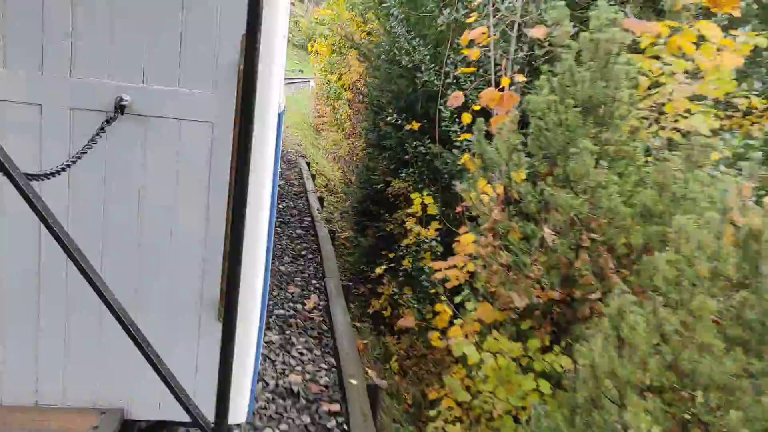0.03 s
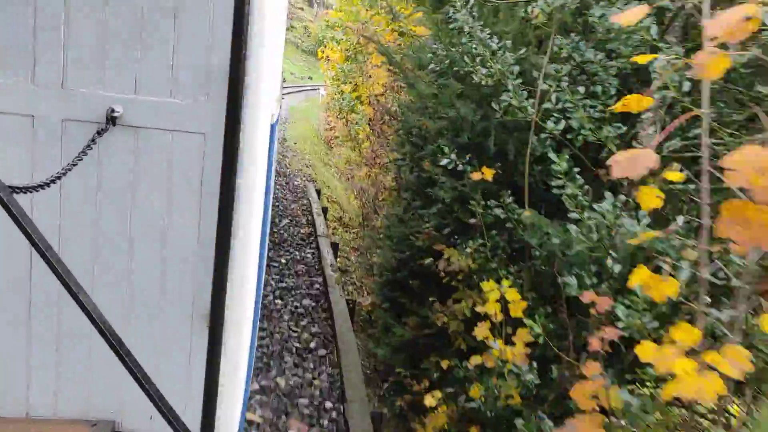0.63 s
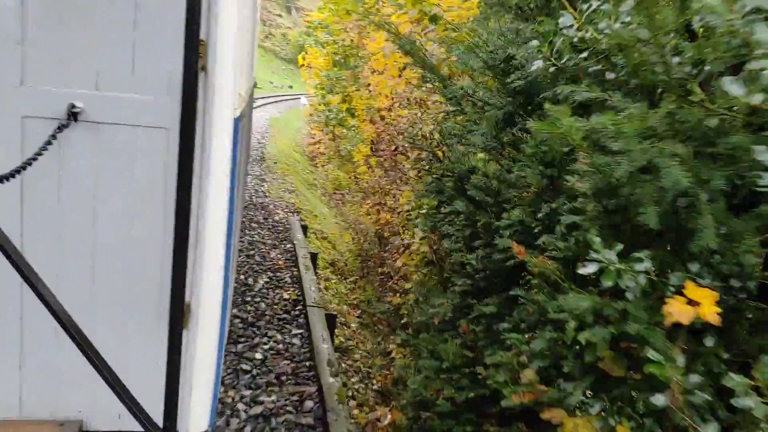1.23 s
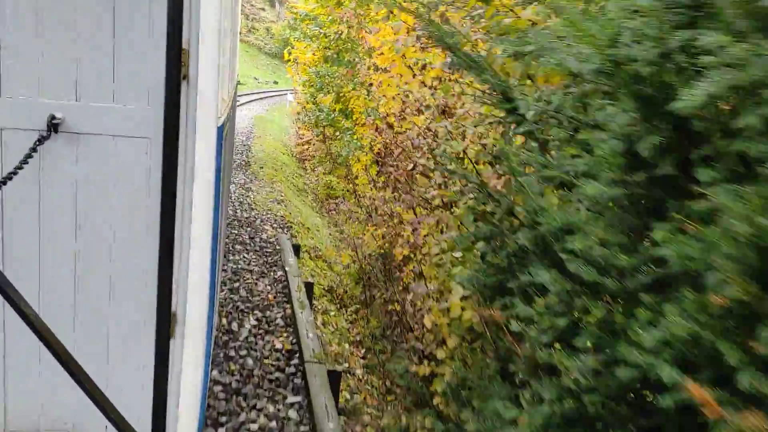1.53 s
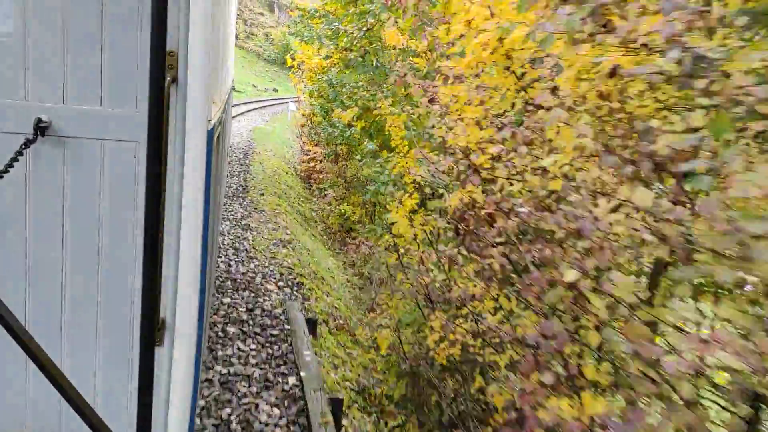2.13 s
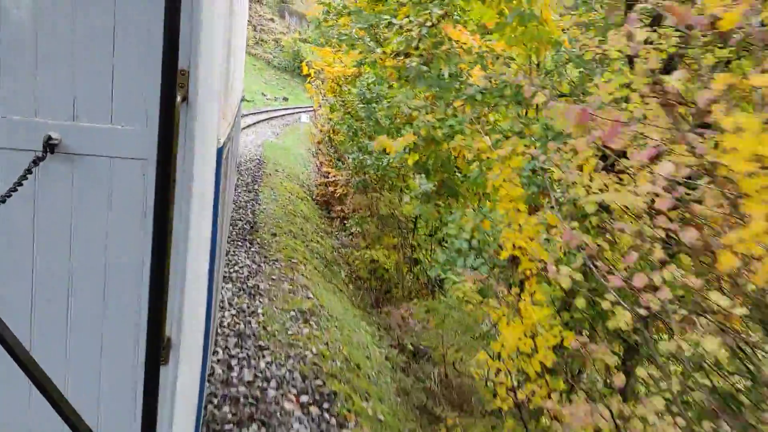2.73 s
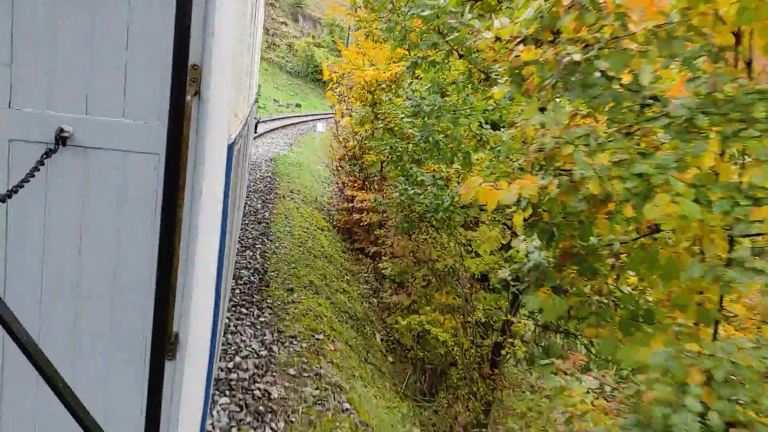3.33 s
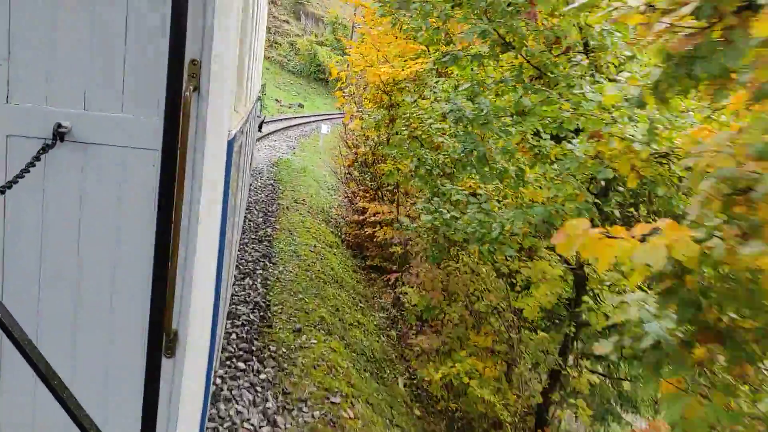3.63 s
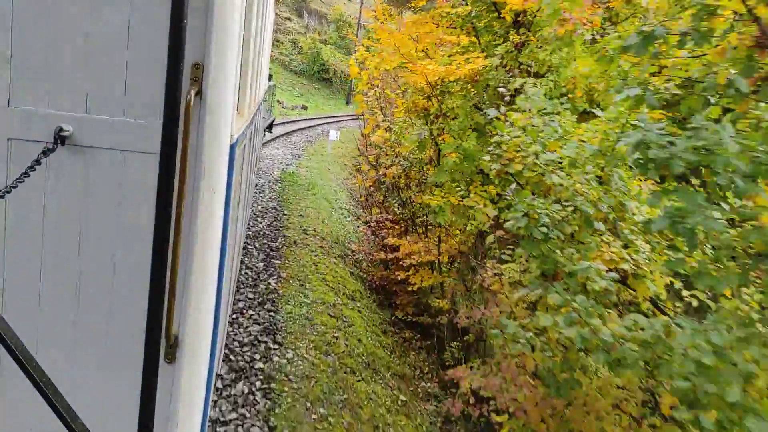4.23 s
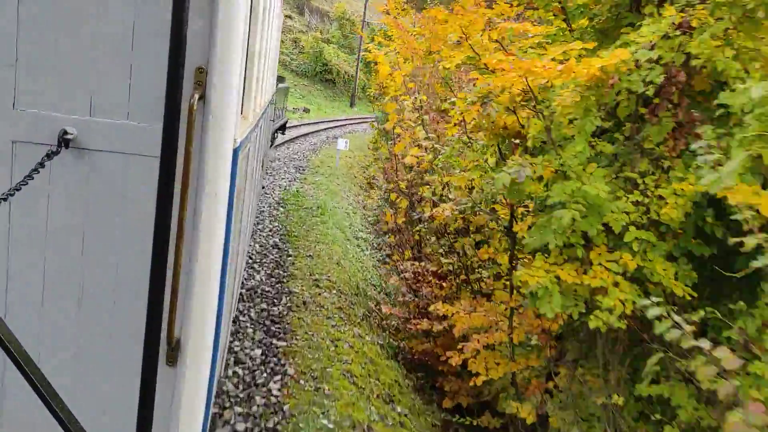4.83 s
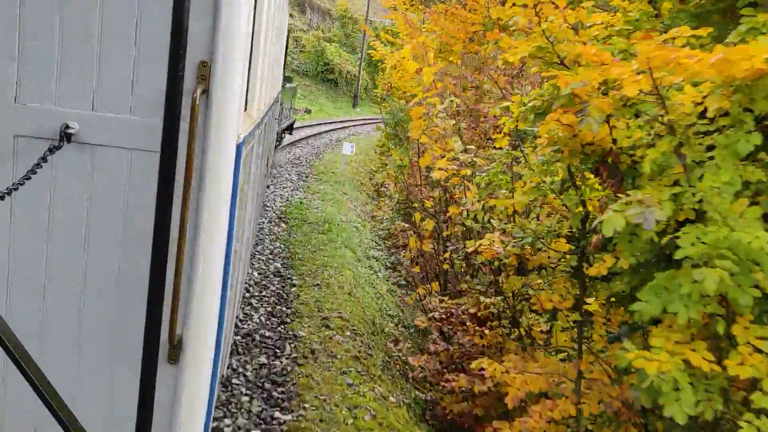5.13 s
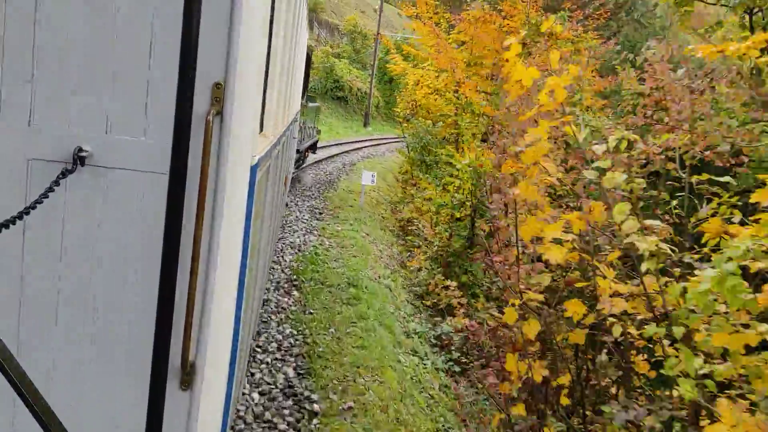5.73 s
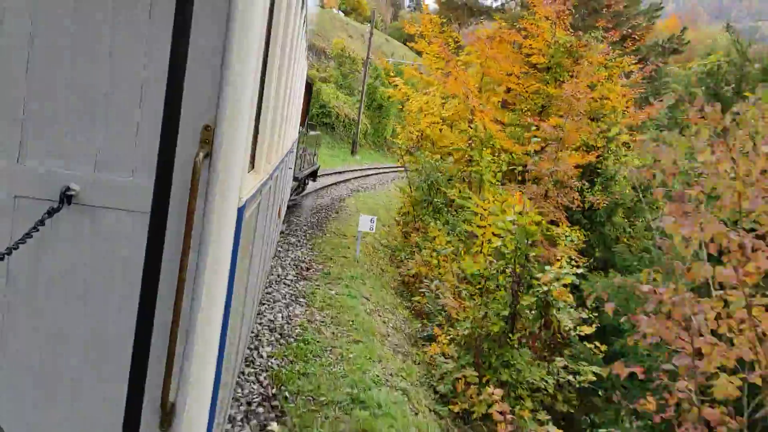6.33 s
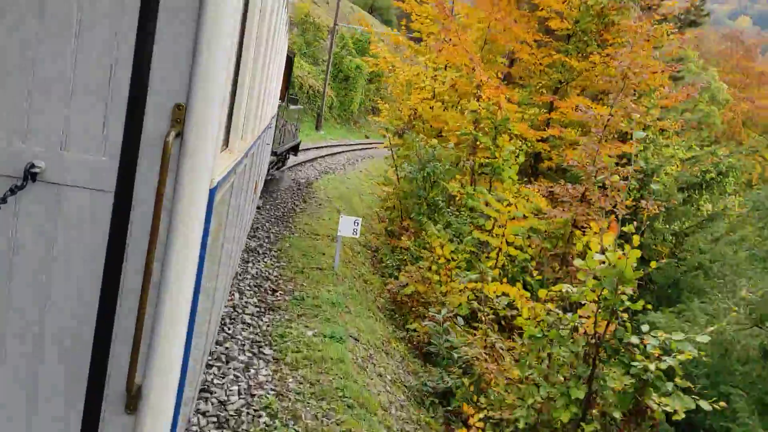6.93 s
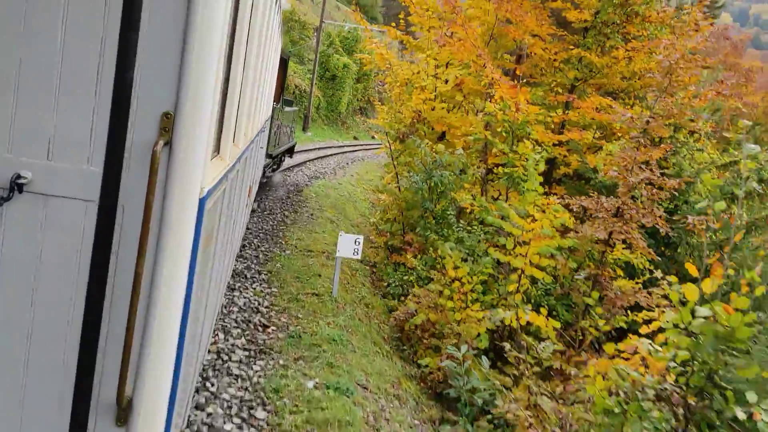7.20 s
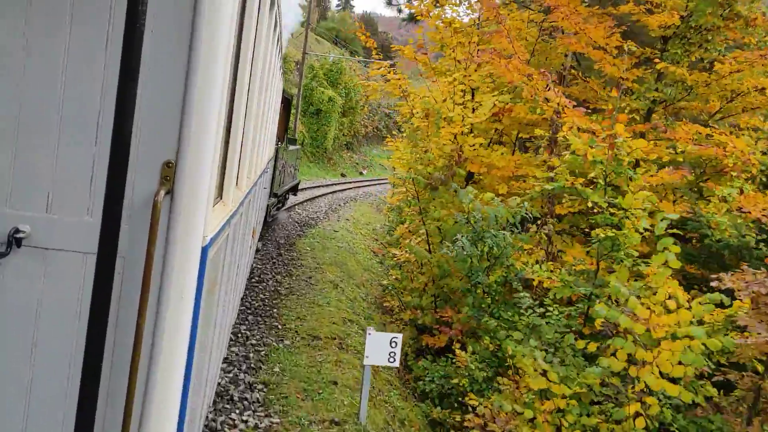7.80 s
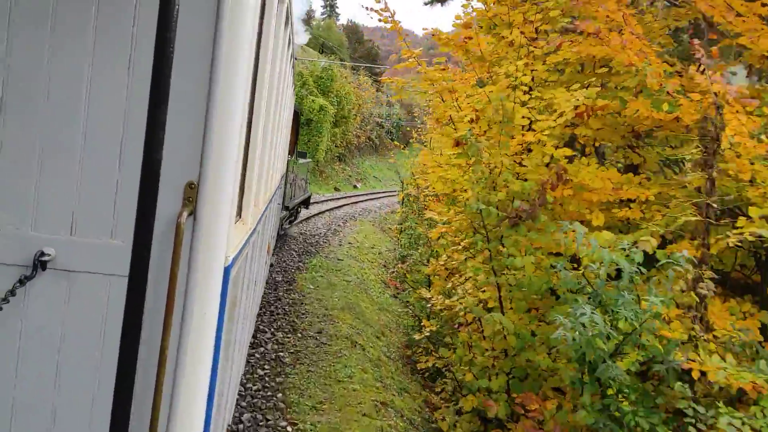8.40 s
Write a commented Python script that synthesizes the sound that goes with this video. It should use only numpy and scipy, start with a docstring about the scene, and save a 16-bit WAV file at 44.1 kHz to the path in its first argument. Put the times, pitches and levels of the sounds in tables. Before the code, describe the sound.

A small steam train runs along the track, heard in stereo from an open carriage window behind the engine. For the whole eight and a half seconds it chuffs about seven times a second, quickening slightly, each beat a chimney puff with a bright hiss. Underneath, the wheels roar and ring faintly while the carriage body booms and rumbles. A low groan slides downward during the first 0.7 seconds. A wheel squeaks very briefly, high at 0.6 seconds and lower at 5 seconds. Wheels clack over rail joints around 1, 2.5, 3.5 to 4, and 5.2 to 5.5 seconds. Loose running gear knocks irregularly throughout with dull thuds and dry clacks, coming thicker after 6 seconds. A steel fitting slaps faintly at 3.8 seconds and harder, with a ringing clank, at 8.1 seconds. The puffs, knocks and rumble grow slightly louder near the end.

```python
"""Steam chuffs, about seven a second, over wheel roar and a brief falling groan: a small train on a curve,
heard from an open carriage window behind the engine. Each exhaust beat is a chimney puff and a hiss.
Rough rails make the wheels roar and sing and the carriage body boom. Wheels clack over rail joints,
loose running gear knocks, a steel fitting slaps, and a flange squeaks twice against the rail."""
import sys
import numpy as np
from scipy import signal
from scipy.fft import rfft, irfft, next_fast_len
from scipy.io import wavfile
from scipy.ndimage import map_coordinates

SR = 44100
rng = np.random.default_rng(int(sys.argv[2]) if len(sys.argv) > 2 else 0)


def unload_audio(sound):
    """Save the sound as a 16-bit wav file, at the path given as the first command line argument."""
    columns = np.transpose(np.atleast_2d(sound))
    # keep every value between -1 and 1, then stretch to whole-number steps
    steps = np.round(np.clip(columns, -1, 1) * 32767)
    wavfile.write(sys.argv[1], SR, steps.astype(np.int16))


N = 377496

# Table levels are relative; each source adds its own trim.
# frame rumble: (time [s], level [dB])
RUMBLE_LEVELS = [(0, -31.5), (1.7, -31), (2.6, -28.5), (3.5, -32), (4.5, -30), (5.6, -29.5), (6.4, -28.5),
                 (7.3, -30), (8.5, -27)]
# running noise: (time [s], body boom [dB], rail roar [dB])
RUNNING_LEVELS = [(0.0, -24.5, -28.5), (0.31, -22, -29), (0.57, -25.5, -28.5), (3.12, -25.5, -29.5),
                  (3.65, -24, -27), (3.91, -27, -28), (4.29, -25, -31), (5.1, -22.5, -26.5),
                  (5.46, -25.5, -31), (6.49, -22.5, -26), (7.72, -22.5, -26), (7.89, -22, -23),
                  (8.2, -21.5, -25), (8.56, -20, -26)]
# falling groan: (time [s], pitch [Hz], level [dB])
GROAN_PATH = [(0, 225.6, -31), (.12, 221.8, -21), (.27, 204.5, -24), (.37, 179, -25), (.52, 155.7, -29),
              (.68, 150.4, -35), (.85, 150, -100)]
# flange squeaks: (crest [s], pitch [Hz], level [dB], half length [s], glide [Hz/s], scatter [Hz])
SQUEAKS = [(0.573, 7870, -30, 0.023, -2500, 79.4), (4.955, 2600, -29, 0.014, -8000, 295)]
# fitting slaps: (time [s], level [dB])
SLAPS = [(3.768, -41), (8.076, -28)]
# running gear knocks: (time [s], thud [dB], note [Hz], t60 [s], clack [dB])
KNOCKS = [(0.121, -16, 227, .1, -36), (.275, -13, 260, 0.066, -40), (.904, -9.5, 240, .06, -44),
          (1.55, -8.5, 256, .1, -34), (1.818, -7, 230, 0.055, -34), (2.176, -6, 266, 0.076, -32),
          (2.325, -14, 272, 0.066, -38), (2.821, -13, 201, 0.028, -44), (3.232, -7.5, 284, .1, -40),
          (3.467, -5, 190, 0.11, -27), (3.698, -9, 240, 0.057, -42), (3.73, -7, 265, .05, -31),
          (3.827, -9, 226, 0.061, -21.5), (4.0, -10, 220, 0.058, -39), (4.39, -13, 225, 0.066, -42),
          (4.537, -2.5, 261, 0.19, -27), (4.891, -8.5, 384, 0.11, -39), (5.072, -6.5, 255, .13, -27),
          (5.74, -11.5, 250, 0.072, -31), (6.13, -6.5, 196, .09, -32), (6.17, -8.5, 188, .12, -29),
          (6.39, -6, 199, 0.11, -35), (6.492, -4.5, 245, 0.13, -36), (6.563, -3, 233, 0.14, -28),
          (6.66, -10.5, 250, 0.065, -40), (6.738, -10, 272, 0.12, -30), (6.781, -7, 189, 0.12, -40),
          (6.973, -12.5, 195, 0.11, -28), (7.183, -8, 217, 0.044, -27), (7.381, -9, 172, .14, -30),
          (7.608, -8, 198, 0.15, -44), (7.865, -2.5, 190, 0.2, -28), (7.969, -3.5, 195, 0.11, -31),
          (8.014, -6, 197, .09, -34), (8.185, -2, 184, 0.092, -42), (8.25, 0, 270, .12, -20.5),
          (8.443, -3, 270, 0.19, -36)]
# rail joint strikes: (time [s], thud [dB], note [Hz], thud lag [s], clank [dB], steel ring [dB],
# scrape [dB], scrape lag [s], rise [s])
JOINTS = [(0.866, -9, 231, 0.0021, -23.5, -46, -39, 0.0027, .0007),
          (0.922, -9, 226, .012, -23, -23, -26, 0.0011, .002),
          (1.118, -15, 196, 0.0092, -20, -23, -34, 0.0019, 0.0055),
          (1.215, -9.5, 248, .009, -20, -24, -26, 0.0011, 0.0035),
          (2.362, -10, 246, 0.0012, -18, -24, -23.5, 0.00092, 0.00047),
          (2.653, -10.5, 203, 0.0051, -16, -25, -24, 0.016, .004),
          (3.563, -15, 213, .012, -24, -29, -27, .002, 0.0043),
          (3.767, -11.5, 250, .002, -22.5, -20, -39, .002, .0008),
          (4.103, -9, 256, 0.00604, -17.5, -33, -34, .002, .002),
          (5.196, -8, 254, .001, -18.5, -38, -28, 0.007, 0.00041),
          (5.484, -9.5, 193, 0.00086, -22.5, -32, -32, 0.01, 0.00044),
          (8.076, -27, 293, .012, -18, -11.5, -28, 0.0011, 0.00088)]
# exhaust beats, four per wheel turn, quickening: (crest [s], hiss [dB], puff [dB], whistle [dB])
BEATS = [(0.027, -26.5, -27, -42), (0.189, -27, -24.5, -38), (0.347, -29.5, -26, -41),
         (0.504, -28, -27, -48), (0.648, -29.5, -27.5, -40), (0.806, -29, -28.0, -43),
         (0.957, -33, -29, -50), (1.115, -25, -22, -35), (1.245, -29, -23, -50), (1.401, -26, -25.5, -41),
         (1.562, -29, -25.5, -37), (1.717, -26.5, -25, -36), (1.854, -26.5, -27, -50),
         (2.006, -26.5, -25, -37), (2.174, -28, -27.5, -48), (2.316, -26, -27.5, -50),
         (2.445, -36, -38, -47), (2.603, -24.5, -23.5, -32), (2.745, -25.5, -24, -37),
         (2.898, -25.5, -25, -36), (3.041, -27, -27, -40), (3.192, -27, -24.5, -41),
         (3.341, -27, -26.5, -37), (3.484, -25, -28, -30), (3.615, -24.5, -29, -30), (3.767, -24, -30, -44),
         (3.917, -28.5, -27, -39), (4.059, -25.5, -24.5, -36), (4.187, -27, -28, -33.5),
         (4.343, -27, -27, -36), (4.487, -27.5, -25.5, -35), (4.628, -26, -26, -39), (4.771, -29, -27, -40),
         (4.918, -25.5, -25.5, -43), (5.066, -25, -28, -29), (5.205, -27.5, -24, -50),
         (5.328, -28, -25, -50), (5.478, -24.5, -25, -34), (5.626, -26.5, -27, -36), (5.763, -25, -22, -32),
         (5.892, -27, -23.5, -44), (6.045, -25, -24, -35), (6.185, -24, -27, -35), (6.321, -25, -24.5, -45),
         (6.451, -24, -26, -42), (6.6, -25.5, -24.5, -50), (6.736, -26, -26, -34), (6.882, -26, -26.5, -48),
         (7.001, -27, -23, -50), (7.163, -24.5, -21.5, -66), (7.293, -25.5, -23.5, -34),
         (7.427, -27, -23, -34.5), (7.556, -28, -26, -32), (7.705, -26, -23.5, -44),
         (7.845, -27, -20.5, -32), (7.985, -25.5, -20.5, -40), (8.114, -26.5, -19, -50),
         (8.249, -24, -21, -34), (8.402, -26, -29, -28.5), (8.543, -24.5, -23.5, -29)]

# carriage body modes: (frequency [Hz], width [Hz], level [dB])
BODY_MODES = [(149.2, 9.9, 2.5), (200.5, 47, 0.5), (230.6, 13, 6), (266.4, 73, 1.5), (291, 52, -17.5),
              (388, 40, -19.5), (496, 47, -14), (586, 16, -19), (843, 180, -20.5)]
# steel modes: (frequency [Hz], level [dB], t60 [s])
WHEEL_MODES = [(970, -3.5, 0.066), (1348, -1, 0.052), (1700, 2.5, 0.14), (2018, -4, 0.058), (2360, 3, 0.11),
               (2530, 0, 0.17), (2680, 2, 0.071), (3120, 4, 0.05)]
FITTING_MODES = [(1764, 2, .1), (2290, -5, .09), (2510, 3, 0.087), (2767, -3, 0.069)]
# rolling and contact spectra: (frequency [Hz], density [dB])
RUMBLE_SPECTRUM = [(15, -5.5), (28, -5), (45, 0.5), (58, 1.5), (85, -0.5), (120, -3), (170, -14),
                   (400, -56)]
ROAR_SPECTRUM = [(150, -18), (400, 4.5), (560, 0), (820, 1), (1100, -2.5), (1300, -1), (1500, -2),
                 (1850, -2), (2300, -6), (3300, -10), (5000, -14), (7500, -6.5), (9000, -15), (11000, -17),
                 (15000, -11)]
CLANK_SPECTRUM = [(200, -38), (450, 4.5), (780, 2), (1300, 4.5), (1900, -3), (2600, -9), (3400, -8.5),
                  (4500, -14), (9000, -26)]
SCRAPE_SPECTRUM = [(800, -36), (2000, 1), (3400, 0), (4600, -1), (6000, 0), (7100, 6.5), (8200, -1.5),
                   (9000, -7), (11000, -13), (15000, -18)]
# steam spectra: (frequency [Hz], density [dB])
LEAK_SPECTRUM = [(1500, -22), (2800, -0.5), (4000, 2), (5500, 2), (7000, -4), (9500, -14)]
SIZZLE_SPECTRUM = [(8500, -38), (10000, -4), (12000, -0.5), (15000, 2)]
HISS_SPECTRUM = [(800, -43), (2000, -2), (3400, -5.5), (4600, -5.5), (6000, -2.5), (7050, 3), (8200, -1),
                 (9000, -7.5), (11000, -6.5)]
PUFF_SPECTRUM = [(100, -28), (190, 1.5), (350, 6.5), (530, 4), (630, 8.5), (780, 5), (950, -2),
                 (1330, -1.5), (1550, -8), (2000, -5), (3000, -16), (6000, -53)]

# microphone likeness: (frequency [Hz], left-right correlation [-])
MIC_CORRELATION = [(60, 0.84), (200, .95), (400, 0.88), (700, 0.6), (1300, 0.26), (2500, 0.02),
                   (8000, -0.01)]
# microphone imbalance: (frequency [Hz], left minus right [dB])
MIC_BALANCE = [(50, 4.5), (350, 5.5), (700, 1), (1300, 3), (3000, 0), (4300, -1), (5500, -3), (6900, -9),
               (8200, 0), (12000, -0.5)]
# microphone treble loss: (frequency [Hz], gain [dB])
MIC_TREBLE = [(8900, 2), (9250, 0), (9700, -13.5), (13500, -22), (16000, -35)]

TIME_S = np.arange(N) / SR
BLOW_TIME_S = np.arange(SR // 4) / SR


def amp(db):
    """Decibels to gain."""
    return 10 ** (np.asarray(db) / 20)


def unit_rms(x):
    """Scale to rms 1."""
    return x / np.sqrt(np.mean(x ** 2) + 1e-20)


def log_interp(points, hz):
    """Interpolate (frequency [Hz], value) points on a log axis."""
    knots_hz, values = np.transpose(points)
    return np.interp(np.log(hz + 1), np.log(knots_hz + 1), values)


def curves(rows):
    """Per-sample curve for each column after the time."""
    knots_s, *columns = np.transpose(rows)
    return [np.interp(TIME_S, knots_s, column) for column in columns]


def wobble(rate_hz):
    """Smooth random curve with knots at rate_hz."""
    return map_coordinates(rng.standard_normal(N // 100), [TIME_S * rate_hz], mode="wrap")


def filtered(x, response):
    """Apply a frequency response by padded FFT."""
    n = x.shape[-1]
    size = next_fast_len(n + 8192)
    return irfft(rfft(x, size) * response(np.fft.rfftfreq(size, 1 / SR)), size)[..., :n]


def colour(spectrum):
    """Response of a spectrum table."""
    return lambda hz: amp(log_interp(spectrum, hz))


def resonances(modes):
    """Causal response of band-pass modes, alternating in sign."""
    return lambda hz: sum(
        (-1) ** k * amp(db) * 1j * hz * width_hz / (mode_hz ** 2 - hz ** 2 + 1j * hz * width_hz)
        for k, (mode_hz, width_hz, db) in enumerate(modes))


def stereo(pair, response):
    """Two unrelated signals to coloured left and right, alike in the bass; rms 1."""
    def mid_side(hz):
        angle_rad = np.arccos(np.clip(log_interp(MIC_CORRELATION, hz), -1, 1)) / 2
        return response(hz) * np.array([np.cos(angle_rad), np.sin(angle_rad)])
    mid, side = filtered(pair, mid_side)
    return unit_rms(np.array([mid + side, mid - side]))


def noise(response):
    """Steady stereo noise; rms 1."""
    return stereo(rng.standard_normal((2, N)), response)


def add(out, start_s, level_db, x):
    """Mix x into out."""
    part = out[:, max(0, round(start_s * SR)):][:, :x.shape[1]]
    part += amp(level_db) * x[:, :part.shape[1]]


def decay(t60_s, hold_s=0):
    """Envelope of a blow: hold, then fall 60 dB per t60_s."""
    return amp(-60 * np.maximum(BLOW_TIME_S - hold_s, 0) / t60_s)


def contact(spectrum, rise_s, hold_s, t60_s, strike, uneven_db, landing_s=0.00192):
    """A contact chatters in uneven taps, with a sharp strike if it closes quickly; rms 1."""
    t = BLOW_TIME_S
    taps = amp(uneven_db * np.tanh(wobble(900)[:len(t)]))
    envelope = (1 - np.exp(-t / rise_s)) * decay(t60_s, hold_s)
    force = unit_rms(taps * envelope * rng.standard_normal((2, len(t))))
    impulse = unit_rms(signal.unit_impulse(len(t), round(landing_s * SR)))
    force[0] += strike * np.exp(-rise_s / landing_s) * impulse
    return stereo(force, colour(spectrum))


def steel_ring(modes, detune, linewidth_hz, hold_s):
    """Struck steel modes, varied per blow and roughened by the contact; rms 1."""
    t = BLOW_TIME_S
    hz, db, t60_s = np.transpose(modes)[:, :, None]
    scatter_db = rng.normal(0, 2, (2, len(modes), 1))
    hz = hz * (1 + detune * rng.standard_normal(hz.shape))
    walk = np.cumsum(rng.standard_normal((2, len(modes), len(t))), axis=2)
    drift_rad = walk * np.sqrt(2 * np.pi * linewidth_hz / SR) + rng.normal(0, 1, scatter_db.shape)
    partials = amp(db + scatter_db) * decay(t60_s, hold_s) * np.sin(2 * np.pi * hz * t + drift_rad)
    return unit_rms(partials.sum(axis=1) * (1 - np.exp(-t / 0.0004)))


def body_thud(note_hz, note_db, note_t60_s, rise_s, judder, judder_t60_s, springs_hz):
    """A push and a judder, cushioned by the springs, ring the body; one panel note stands out; rms 1."""
    t = BLOW_TIME_S
    force = judder * unit_rms(decay(judder_t60_s) * rng.standard_normal((2, len(t))))
    force[0] += unit_rms(signal.unit_impulse(len(t)))
    cushion = lambda hz: 1 / (1 + 1j * hz / springs_hz - (hz / springs_hz) ** 2)
    body = stereo(force, lambda hz: resonances(BODY_MODES)(hz) * cushion(hz))
    note = unit_rms((1 - np.exp(-t / rise_s)) * decay(note_t60_s) * np.sin(2 * np.pi * note_hz * t))
    return unit_rms(body + amp(note_db) * note)


def rolling(contact_patch_hz=600):
    """Rough rails roar, jolt the body and keep the wheel steel singing; the frame rumbles below."""
    boom_db, roar_db = curves(RUNNING_LEVELS)
    rumble_db, = curves(RUMBLE_LEVELS)
    jolts = rng.standard_normal((2, N)) * amp(1.5 * wobble(60))
    boom = amp(boom_db - 0.82) * stereo(jolts, resonances(BODY_MODES))
    roar = amp(roar_db - 2.5 + 1.75 * wobble(30)) * noise(colour(ROAR_SPECTRUM))
    wheel = resonances([(hz, np.log(1000) / np.pi / t60_s, db) for hz, db, t60_s in WHEEL_MODES])
    smoothed = lambda hz: wheel(hz) / (1 + (hz / contact_patch_hz) ** 2)  # patch smooths the rail
    singing = amp(roar_db - 11.5 + 2.5 * wobble(8)) * noise(smoothed)
    rumble = amp(rumble_db) * noise(colour(RUMBLE_SPECTRUM))
    return boom + roar + singing + rumble


def groan():
    """A low, unsteady note slides down."""
    hz, db = curves(GROAN_PATH)
    return amp(db + 2.2 * wobble(24)) * np.sin(2 * np.pi * np.cumsum(hz + 5 * wobble(42)) / SR)


def flange_squeaks():
    """A flange rubs the rail: brief falling notes."""
    out = np.zeros(N)
    for crest_s, hz, db, half_s, glide_hz_per_s, scatter_hz in SQUEAKS:
        t = TIME_S - crest_s
        pitch_hz = hz + glide_hz_per_s * t + scatter_hz * wobble(400)
        out += amp(db) * np.exp(-(t / half_s) ** 2) * np.sin(2 * np.pi * np.cumsum(pitch_hz) / SR)
    return out


def fitting_slaps():
    """A loose steel fitting hits its stop: a hard, short ring."""
    out = np.zeros((2, N))
    for at_s, db in SLAPS:
        add(out, at_s, db, steel_ring(FITTING_MODES, detune=0.004, linewidth_hz=93, hold_s=0.0037))
    return out


def gear_knocks():
    """Loose running gear hits the carriage: a thud and a dry clack."""
    out = np.zeros((2, N))
    for at_s, thud_db, note_hz, t60_s, clack_db in KNOCKS:
        thud = body_thud(note_hz, note_db=2, note_t60_s=t60_s, rise_s=0.0036,
                         judder=2.2, judder_t60_s=t60_s, springs_hz=710)
        clack = contact(CLANK_SPECTRUM, rise_s=0.0008, hold_s=0.005, t60_s=0.13,
                        strike=0.34, uneven_db=5)
        add(out, at_s + 0.002, thud_db - 21.5, thud)
        add(out, at_s + 0.002034, clack_db - 13, clack)
    return out


def rail_joints():
    """A wheel drops into a gap: the body thuds, steel clanks and rings, the tread scrapes the next rail."""
    out = np.zeros((2, N))
    for at_s, thud_db, note_hz, thud_lag_s, clank_db, ring_db, scrape_db, scrape_lag_s, rise_s in JOINTS:
        thud = body_thud(note_hz, note_db=-2.5, note_t60_s=0.14, rise_s=0.0055,
                         judder=1.7, judder_t60_s=0.16, springs_hz=900)
        clank = contact(CLANK_SPECTRUM, rise_s, hold_s=0.011, t60_s=0.14, strike=0.45, uneven_db=0.5)
        ring = steel_ring(WHEEL_MODES, detune=0.0072, linewidth_hz=214, hold_s=0.0088)
        scrape = contact(SCRAPE_SPECTRUM, rise_s, hold_s=0.02, t60_s=0.19, strike=0.17, uneven_db=1.5)
        add(out, at_s + thud_lag_s, thud_db - 16, thud)
        add(out, at_s, clank_db - 13, clank)
        add(out, at_s, ring_db - 15.5, ring)
        add(out, at_s + scrape_lag_s, scrape_db - 7, scrape)
    return out


def steam_flow(levels_db, lead_s, rise_s, fall_s, shape):
    """Each beat swells as the valve opens and ebbs as the cylinder empties."""
    grid_s, power = TIME_S[::32], 0
    for (crest_s, *_), db in zip(BEATS, levels_db):
        t = grid_s - crest_s + lead_s
        exponent = np.where(t < 0, (t / rise_s) ** 2, np.abs(t / fall_s) ** shape)
        power = power + amp(db) ** 2 * np.exp(-exponent)
    return np.interp(TIME_S, grid_s, np.sqrt(power))


def steam_whistle(centre_hz, wander_hz, half_width_hz):
    """Narrow band of steam noise with wandering pitch; rms 1."""
    band = filtered(rng.standard_normal((2, N)), lambda hz: 1 / (1 + (hz / half_width_hz) ** 4))
    pitch_hz = centre_hz + wander_hz * wobble(9)
    return unit_rms(band * np.sin(2 * np.pi * np.cumsum(pitch_hz) / SR))


def engine(sizzle_rise_db_per_s=0.77):
    """Each beat puffs from the chimney, hisses, sizzles and whistles thinly; steam leaks in between."""
    _, hiss_db, puff_db, whistle_db = np.transpose(BEATS)
    flutter = amp(1.2 * wobble(70) + 0.7 * wobble(420))
    hiss_flow = flutter * steam_flow(hiss_db, lead_s=0.0029, rise_s=0.028, fall_s=0.033, shape=1.54)
    whistle_flow = steam_flow(whistle_db, lead_s=0.002, rise_s=0.015, fall_s=0.032, shape=1.06)
    puff_flow = steam_flow(puff_db, lead_s=0.021, rise_s=0.012, fall_s=0.034, shape=0.99)
    hiss = hiss_flow * noise(colour(HISS_SPECTRUM))
    sizzle_db = -36.5 + sizzle_rise_db_per_s * TIME_S + 1.7 * wobble(200)  # sizzle grows steadily louder
    sizzle = amp(sizzle_db) * unit_rms(hiss_flow ** 0.95) * noise(colour(SIZZLE_SPECTRUM))
    leak = amp(-44 + 5.2 * wobble(14)) * noise(colour(LEAK_SPECTRUM))
    whistle = amp(-3.5) * whistle_flow * steam_whistle(centre_hz=3800, wander_hz=25.04, half_width_hz=99)
    puff = puff_flow * noise(colour(PUFF_SPECTRUM))
    return hiss + sizzle + leak + whistle + puff


def scene():
    """Engine, wheels and carriage in stereo."""
    return (engine() + rolling() + groan() + rail_joints() + gear_knocks()
            + fitting_slaps() + flange_squeaks())


def gain_control(x, threshold_db, lag_s, slope):
    """Loud, bright blows briefly turn the gain down."""
    t = np.arange(SR // 2) / SR
    window = t ** 2 * np.exp(-t / lag_s)
    sidechain = filtered(x, colour([(300, -20), (900, 0)]))
    power = np.mean(sidechain ** 2, axis=0)
    smoothed = np.abs(signal.fftconvolve(power, window / window.sum())[:N])
    return x * (1 + (smoothed / amp(threshold_db) ** 2) ** 4) ** (-slope / 4)


def record(dry):
    """Two unequal microphone ports with treble loss, then gain control, soft clip and band limit."""
    ceiling, top_hz = 0.95, 15720
    balance_db = lambda hz: np.outer([0.5, -0.5], log_interp(MIC_BALANCE, hz))
    heard = filtered(dry, lambda hz: amp(log_interp(MIC_TREBLE, hz) + balance_db(hz)))
    held = gain_control(heard, threshold_db=-21, lag_s=0.034, slope=0.83)
    clipped = held / (1 + np.abs(held / ceiling) ** 8) ** (1 / 8)
    return filtered(clipped, lambda hz: hz < top_hz)


dry = scene()
out = record(dry)
unload_audio(out)
```